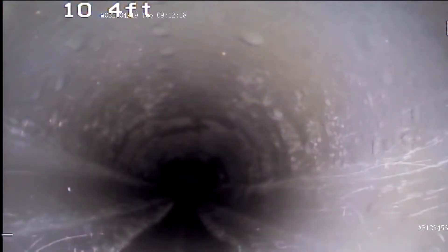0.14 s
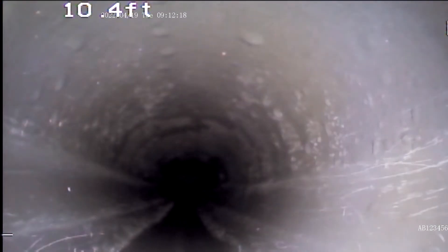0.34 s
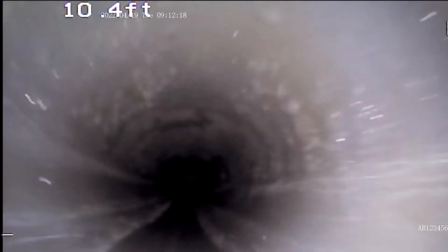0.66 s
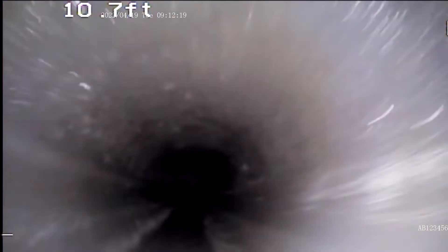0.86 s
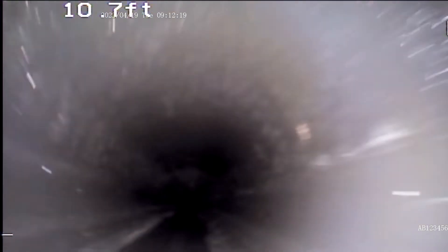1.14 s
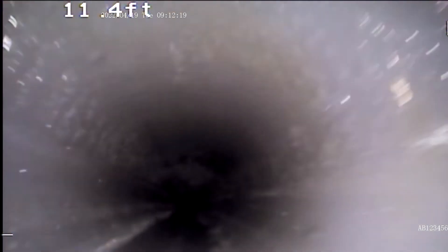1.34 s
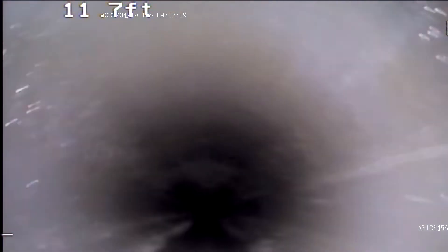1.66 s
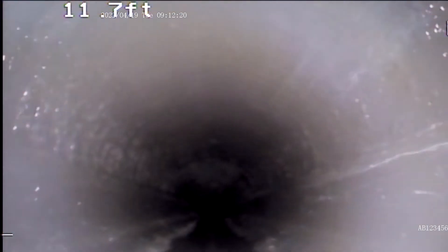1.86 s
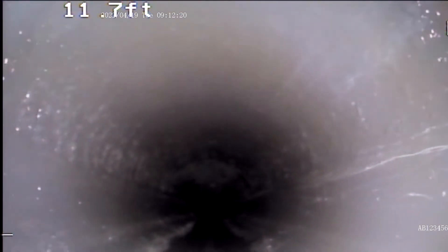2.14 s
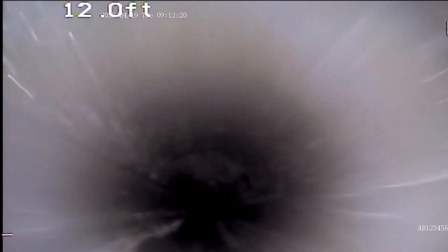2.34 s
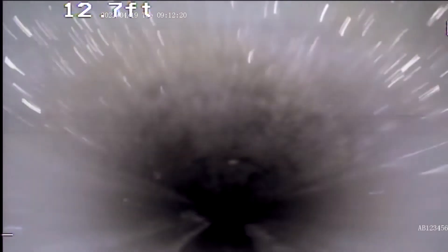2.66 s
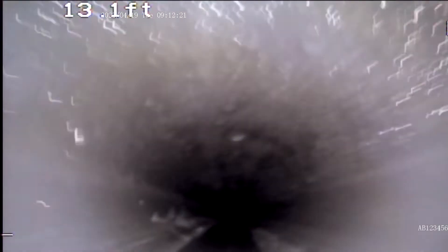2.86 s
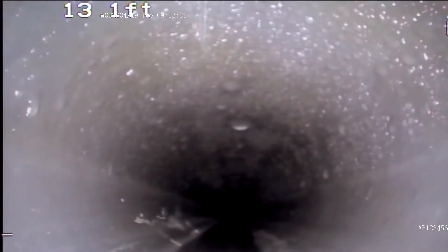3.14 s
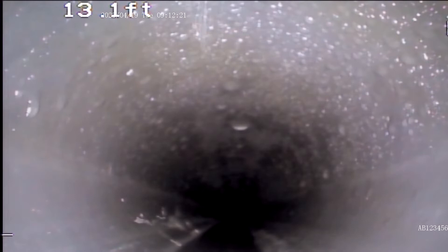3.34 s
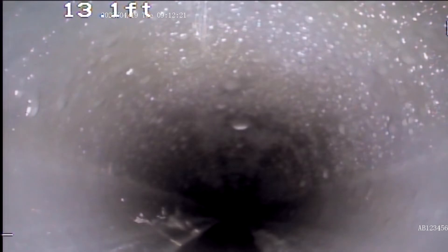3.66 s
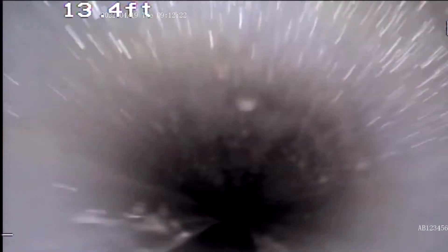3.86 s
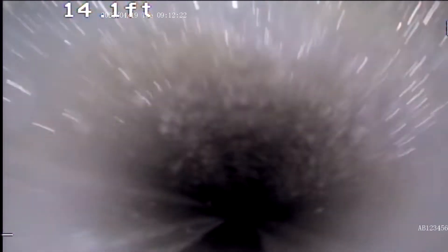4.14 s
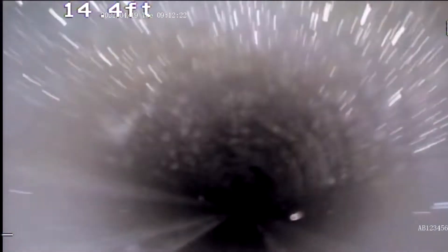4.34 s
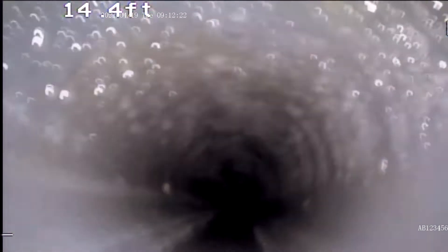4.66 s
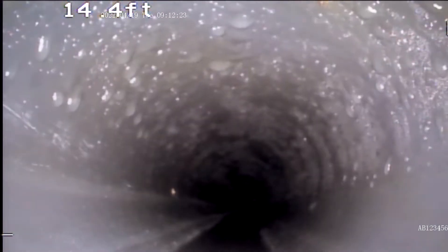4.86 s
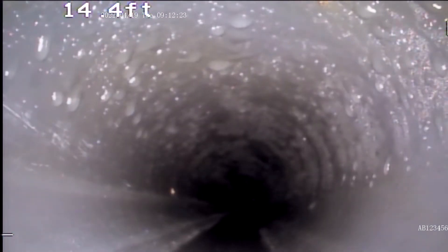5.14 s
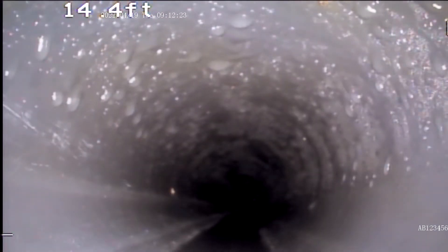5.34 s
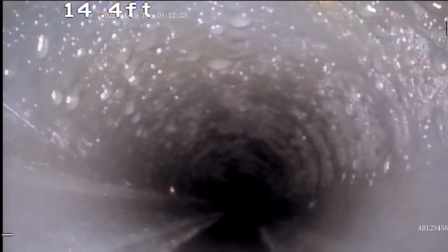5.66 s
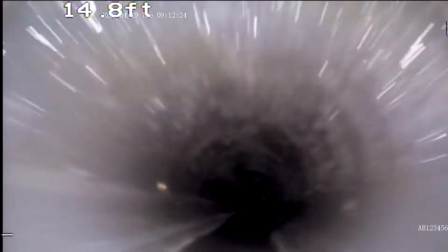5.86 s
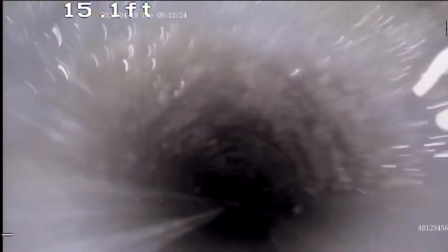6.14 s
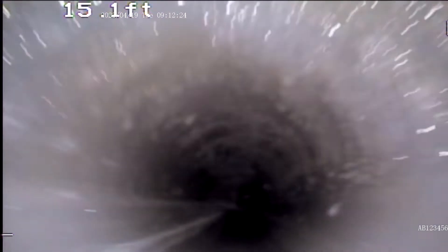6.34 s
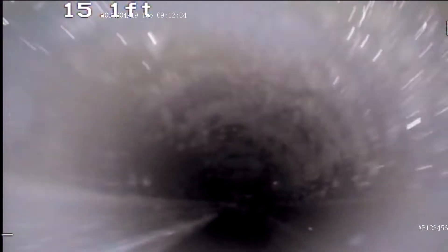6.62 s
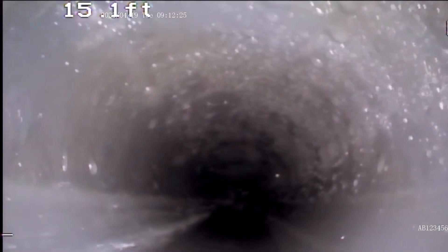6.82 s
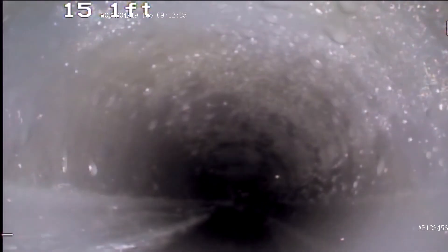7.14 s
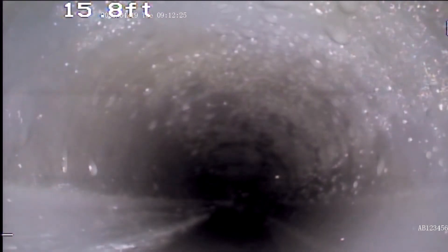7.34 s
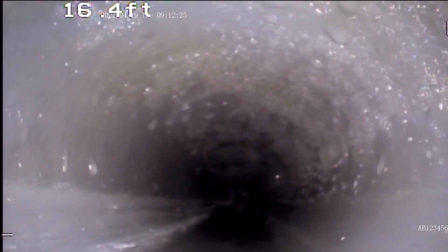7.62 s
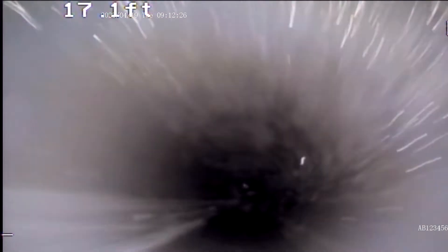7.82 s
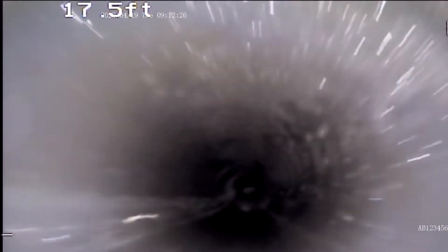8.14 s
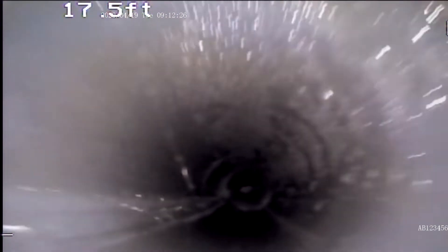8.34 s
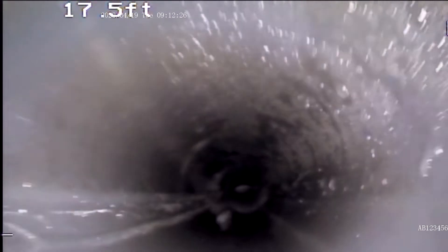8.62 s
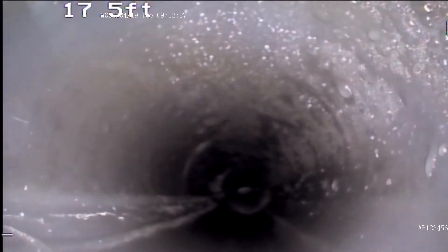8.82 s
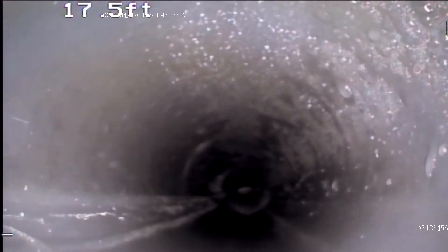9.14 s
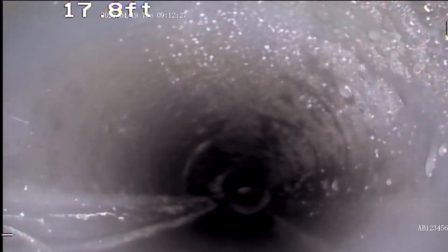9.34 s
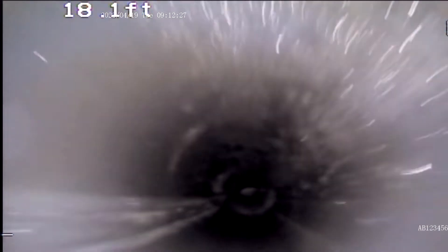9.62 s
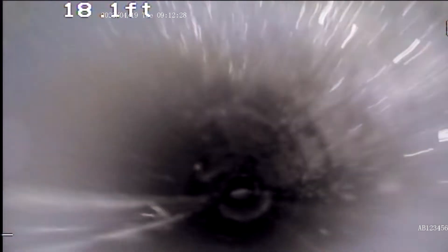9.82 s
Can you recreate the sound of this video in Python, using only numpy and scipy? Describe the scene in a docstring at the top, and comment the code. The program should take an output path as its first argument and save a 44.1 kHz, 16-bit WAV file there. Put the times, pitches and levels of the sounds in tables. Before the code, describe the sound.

Heard close from a small microphone on the reel housing, a stiff cable is pushed into a drain pipe. Gritty stick-slip scraping comes in irregular bursts, with hollow thumps and rattling clunks. Sharp knocks stand out near one, two, three and a half and five and a half seconds. The frame hums low after each shove, and quiet rumble and soft hiss lie beneath. The sound cuts out very briefly early on.

```python
"""A stiff cable is pushed off its reel into a drain pipe, beside a small microphone fixed to the reel's housing.
It scrapes in bursts: stick-slip clicks drive the resonances of drum, shell, fittings and cable guide.
It also knocks: short rattling contacts ring these parts and the frame, which hums when shaken at random.
Steady filtered noise gives room rumble and hiss. The sound drops out once for about a tenth of a second."""
import sys
import numpy as np
from scipy import signal
from scipy.fft import rfft, irfft
from scipy.io import wavfile
from scipy.ndimage import uniform_filter1d

SR = 44100
rng = np.random.default_rng(int(sys.argv[2]) if len(sys.argv) > 2 else 0)


def file_out(sig):
    """Save sig as 16-bit WAV at sys.argv[1]."""
    # one column per channel
    cols = np.atleast_2d(sig).T
    # limit, then scale
    lim = np.clip(cols, -1, 1)
    pcm = np.round(lim * 32767).astype(np.int16)
    wavfile.write(sys.argv[1], SR, pcm)


N = 440553
T = np.arange(N) / SR
STEP = 32  # samples between the times at which levels are worked out
SLOW = T[::STEP]

# Modes of the frame: pitch_hz, width_hz, level_db
FRAME = [(82.3, 12, -15.5), (96.8, 11, -11.5), (118.75, 6.8, -2.5), (163, 30, 3.5), (180, 11, -6)]


def slide(parts):
    """Stick-slip friction: one rubbing force excites the resonances of drum, shell, fittings and guide."""
    grains = wandering(slips(per_s=5600, spread_db=1.5), patchy_db=4.0)
    surges = gain_of(1.3 * drifting(span_s=0.02))
    hold = evened(grip(stutter_db=1.45, stutter_s=0.0092) * surges)
    gritty_hold = evened(hold ** 1.1)  # the fittings follow the grip's stutter most
    holds = np.array([hold, hold, gritty_hold, hold])
    forces = grains * holds * rubbing()
    return signal.oaconvolve(forces, parts, axes=1).sum(0)[:N]


def slips(per_s, spread_db):
    """Stick-slip force: a random train of dense clicks of either sign and uneven size."""
    clicks = (rng.random(N) < per_s / SR) * rng.choice([-1., 1.], N)
    size_db = spread_db * np.minimum(rng.exponential(1, N), 4)
    return clicks * gain_of(size_db)


def wandering(force, patchy_db):
    """Modal coupling: the point of contact moves, so the modes that it favours keep changing; rms 1."""
    spectrum = signal.stft(force, nperseg=1024, noverlap=768)[2]  # frequency by time
    patches = uniform_filter1d(rng.standard_normal(spectrum.shape), size=12, axis=1)
    patches = uniform_filter1d(patches, size=3, axis=0)
    favoured = spectrum * gain_of(patchy_db * evened(patches))
    return evened(signal.istft(favoured, nperseg=1024, noverlap=768)[1][:N])


def grip(stutter_db, stutter_s):
    """Relaxation: the grip changes suddenly at random and settles exponentially; rms 1."""
    catches = (rng.random(N) < 1 / (stutter_s * SR)) * rng.standard_normal(N)
    settling = evened(signal.lfilter([1], [1, -np.exp(-1 / (stutter_s * SR))], catches))
    return evened(gain_of(stutter_db * np.minimum(settling, 2)))


def rubbing():
    """Power addition: incoherent pushes sum to the gains into drum, shell, fittings and guide."""
    # Pushes of the cable; neighbouring ones may run on as stages of one scrape.
    # First and last level are those in the drum, shell and guide are relative to them:
    # start_s, length_s, first_db, last_db, shell_db, guide_db
    strokes = [(0.242, 0.77, -52.5, -51, -7.5, -14), (1.044, 0.23, -44, -34, -7, -12.5),
               (1.33, 0.17, -38.5, -30.5, -10, -15.5), (1.506, 0.78, -45, -62.5, -15.5, -15.5),
               (2.063, 0.064, -55, -34, -6, -7), (2.168, 0.17, -40.5, -39, -6.5, -19),
               (2.361, 0.53, -38, -49, -8, -14), (3.496, 0.047, -48, -40, -9, -15),
               (3.594, 0.028, -38, -35, -7, -27), (3.671, 0.68, -35.5, -59.5, -8, -12),
               (5.294, 0.22, -50, -42.5, -18, -21.5), (5.538, 0.39, -61, -50, -7.5, -9.5),
               (5.99, 0.93, -51.5, -60, -12.5, -12), (7.023, 0.3, -48.5, -61, -8, -3.5),
               (7.339, 0.098, -47.5, -32, -2, -20.5), (7.463, 0.091, -32.5, -36, -5, -16),
               (7.565, 0.11, -39.5, -42, 1.5, -9), (7.674, 0.19, -37.5, -47.5, -4.5, -15.5),
               (7.88, 0.66, -66.5, -62.5, 0, -6.5), (8.949, 0.023, -44, -37.5, -6.5, -14.5),
               (9.005, 0.045, -50, -44.5, 0, -12), (9.077, 0.15, -56, -56.5, -10, -4),
               (9.259, 0.05, -45.5, -36.5, -4, -5), (9.337, 0.14, -40.5, -45, -1.5, -10),
               (9.505, 0.066, -39, -44.5, 0, -8), (9.601, 0.37, -38.5, -68.5, -10.5, -6.5)]
    # The faint rub that never stops: drum_db, shell_db, fittings_db, guide_db
    rest_db = (-71, -78.5, -95, -80)
    attack_db_per_s, release_db_per_s = 1201, 496.5
    grit_swing = 1.4  # dB in the fittings per dB of scrape within a push
    power = gain_of(2 * np.array(rest_db))[:, None]
    for start, length, first_db, last_db, shell_db, guide_db in strokes:
        db = swell(start, length, first_db, last_db, attack_db_per_s, release_db_per_s)
        # the more a push reaches the shell, the grittier it is
        grit_db = -9.5 + 1.3 * shell_db
        swing_db = (grit_swing - 1) * (db - (first_db + last_db) / 2)
        levels_db = np.array([db, db + shell_db, db + grit_db + swing_db, db + guide_db])
        power = power + gain_of(2 * levels_db)
    return filled(np.sqrt(power))


def knocks(parts, base_contact_s, shudder_db, shudder_s):
    """Impact excitation: a short rattling contact and a weaker, longer shudder ring every part."""
    # Blows of the cable; the last three are relative to the peak in the shell, for frame, drum and fittings:
    # start_s, shell_peak_db, thump_db, boom_db, crack_db
    blow_table = [(1.001, -32.5, 14.5, 9.5, -9.5), (1.141, -28.5, 2, 8.5, -5.5), (1.199, -8, -9.5, -1, -6),
                  (1.228, -14.5, -14, 0.5, -7.5), (1.257, -23.5, 8, -20, -8), (1.334, -36, -10, -4, -3),
                  (1.414, -29.5, 8.5, 9, -43), (1.453, -21.5, 9, 4.5, -8), (1.697, -39, 8, 16, -8.5),
                  (1.741, -45, 19.5, 20.5, -8.5), (1.998, -34, -6, 2.5, -8), (2.13, -17.5, -11, -1, -6),
                  (2.143, -10, -26, -1, -7.5), (2.197, -38.5, 13, 10, 7.5), (2.53, -27, -24, -11, -8),
                  (3.234, -68.5, -6, 22, -10), (3.43, -41, -15.5, 3, -10.5), (3.659, -10, -12.5, -1.5, -6),
                  (3.881, -32, -22, -8, -9.5), (3.975, -43.5, -4, 5, -7), (4.035, -40, 7, 9, -12),
                  (4.552, -57.5, 28, 17, -14), (5.336, -31.5, 5.5, 1.5, -11), (5.386, -23, -17, -5, -40),
                  (5.402, -6, -19, -1.5, -7.5), (5.483, -37, 11.5, -11, -9.5),
                  (6.011, -29.5, -11, -4.5, -9), (6.048, -36.5, -10, 1.5, -18),
                  (6.26, -22, -5.5, -2.5, -7.5), (6.462, -65.5, 1, 23.5, -9), (6.721, -32.5, -41, -6, -10),
                  (6.783, -40, -17, -10.5, -8.5), (6.897, -40, -7, -8.5, -5),
                  (7.024, -53.5, 26.5, 16.5, -0.5), (7.407, -21, -16.5, -15, -7.5),
                  (7.812, -33.5, -17, 0, -8), (7.833, -34, 4, 10, -41), (8.961, -42, 3.5, 15, -2),
                  (9.245, -31.5, -7, -15.5, -33), (9.614, -22, -1, 3, -2.5), (9.635, -25, -27, 5.5, -10)]
    out, t = np.zeros(N + SR), np.arange(SR // 8) / SR
    shove = t * np.exp(-t / 0.0023)  # the heavy frame takes the blow mostly as one push
    for start, peak_db, thump_db, boom_db, crack_db in blow_table:
        # weak or boomy blows stay longer in contact
        contact_s = base_contact_s * gain_of(0.3 * boom_db - 0.11 * (peak_db + 10))
        u = t / contact_s
        envelope = np.exp(-u ** 2) + gain_of(shudder_db) * np.exp(-t / shudder_s)
        blow = rng.standard_normal(len(t)) * np.minimum(2.8 * u, 1) * envelope
        blow /= np.linalg.norm(blow)
        # the harder the blow, the brighter
        edge = -0.025 * peak_db * blow + np.diff(blow, prepend=0)
        # a weak crack is also a dull one
        top_hz = np.clip(15000 * gain_of(crack_db + 5.0), 4000, SR / 2.2)
        edge = signal.lfilter(*signal.butter(3, top_hz, fs=SR), edge)
        # frame, drum, shell, fittings, guide
        forces = [shove / shove.sum() + 0.14 * blow, blow, edge, edge, edge]
        answers = signal.fftconvolve(forces, parts, axes=1)
        levels_db = peak_db + np.array([thump_db, boom_db, 0, crack_db, -12])
        levels = gain_of(levels_db) / abs(answers).max(1)
        at = round(start * SR)
        out[at:at + answers.shape[1]] += levels @ answers
    low_cut = signal.butter(4, 62, "high", fs=SR, output="sos")  # nothing rings below the frame
    return signal.sosfilt(low_cut, out[:N])


def sway():
    """Forced resonance: random shaking hums the low frame modes nearest the shake's pitch, and the top mode."""
    low_gain, centre_hz, high_gain = shaking()
    loaded = 1 + 0.01 * drifting(span_s=0.08)  # the cable's load bends the pitch
    jolts = evened(gain_of(3.0 * drifting(span_s=0.025)))  # the top mode comes in broken bursts

    def hum(hz, width, db):
        """Noise-driven resonance of one mode."""
        return gain_of(db) * resonate(rng.standard_normal(N), hz * loaded, width, steady=0.8)

    low_tones = np.array([hum(*mode) for mode in FRAME[:3]])
    low_hz = np.transpose(FRAME)[0][:3, None]
    near = np.exp(-((low_hz - centre_hz) / 18) ** 2)
    near_power = (near ** 2 * low_tones.var(1)[:, None]).sum(0)
    low = (low_tones * near).sum(0) / np.sqrt(near_power)
    return low * low_gain + hum(*FRAME[-1]) * jolts * high_gain


def shaking():
    """Double decay: gain of the low modes, their pitch (the strongest shake leads) and gain of the top mode."""
    # Shakes that set the frame humming; low_db is before the lingering part is added,
    # high_db before the top mode's own level: start_s, hold_s, low_db, pitch_hz, high_db
    shakes = [(0, 0.069, -51.5, 123, -66), (0.381, 0.014, -49, 92.7, -32), (0.52, 0.47, -51, 103, -45),
              (1.002, 0.63, -42.5, 98.6, -37.5), (1.735, 0.051, -36.5, 94, -52),
              (2.127, 0.045, -40, 99.3, -33.5), (2.324, 0.55, -68, 99, -35),
              (2.773, 0.088, -46, 103, -34.5), (3.2, 0.34, -59, 97, -50.5), (3.629, 0.24, -43.5, 94.3, -35),
              (4.003, 0.31, -49.5, 90, -40.5), (5.317, 0.26, -39.5, 102.3, -35.5),
              (5.661, 0.82, -60, 92.2, -46.5), (6.253, 0.31, -48, 99, -40.5), (7.006, 0.18, -48, 104, -44),
              (7.376, 0.67, -49.5, 94.4, -42), (8.211, 0.67, -63, 77.2, -75.5),
              (8.949, 0.55, -49.5, 90.3, -46), (9.636, 0.015, -36, 97, -19)]
    rise_db_per_s, high_fade_db_per_s = 492.5, 64
    # the low modes drop fast, then linger
    low_fade_db_per_s, linger_db, linger_fade_db_per_s = 76.5, -11, 15
    low, pitch, high = 1e-20, 0, 1e-20
    for start, hold, low_db, hz, high_db in shakes:
        fast_db = swell(start, hold, low_db, low_db, rise_db_per_s, low_fade_db_per_s)
        slow_db = linger_db + swell(start, hold, low_db, low_db, rise_db_per_s, linger_fade_db_per_s)
        power = gain_of(2 * fast_db) + gain_of(2 * slow_db)
        low, pitch = low + power, pitch + power * hz
        high = high + gain_of(2 * swell(start, hold, high_db, high_db, rise_db_per_s, high_fade_db_per_s))
    return filled([np.sqrt(low), pitch / low, np.sqrt(high)])


def resonate(x, hz, width, steady):
    """Heterodyne resonator: shifts hz to zero, smooths twice, evens out part of the fading, shifts back; rms 1."""
    turn = np.exp(2j * np.pi * np.cumsum(hz) / SR)
    r = np.exp(-np.pi * width / SR)
    slow = signal.lfilter([1], [1, -2 * r, r ** 2], x / turn) + 1e-9
    return evened((turn * slow / abs(slow) ** steady).real)


def room():
    """Stationary coloured noise: rumble of the surroundings and microphone hiss."""
    # Spectral density of the noise before it is scaled to its rms level: pitch_hz, relative_db (per Hz)
    colour_table = [(25, -28), (94, -16), (527, -34), (1040, -40.5), (1900, -54.5), (15800, -60.5)]
    rms_db = -58.5
    hz, (f, db) = np.fft.rfftfreq(N, 1 / SR), np.transpose(colour_table)
    colour = gain_of(np.interp(np.log(hz + 1), np.log(f + 1), db))
    noise = irfft(rfft(rng.standard_normal(N)) * colour, N)
    return gain_of(rms_db) * evened(noise)


def ringing(modes, rise_s):
    """Modal superposition: a part answers a unit push with a sum of decaying sines; energy 1."""
    t = np.arange(SR // 2) / SR
    out = np.zeros(len(t))
    for hz, width, db in modes:
        decay = np.sqrt(width) * np.exp(-np.pi * width * t)
        out += gain_of(db) * decay * np.sin(2 * np.pi * hz * t)
    out *= 1 - np.exp(-t / rise_s)  # a soft start keeps each part out of its neighbours' bands
    return out / np.linalg.norm(out)


def swell(start, length, first_db, last_db, rise, fall):
    """Exponential growth and decay: straight lines in dB up to first_db, on to last_db, then down (dB a second)."""
    held = np.interp(SLOW, [start, start + length + 1e-6], [first_db, last_db])
    before = rise * np.maximum(start - SLOW, 0)
    after = fall * np.maximum(SLOW - start - length, 0)
    return held - before - after


def drifting(span_s):
    """Low-passed chance: noise averaged twice over the span; rms 1."""
    size = max(round(span_s * SR / STEP), 1)
    chance = uniform_filter1d(rng.standard_normal(len(SLOW)), size=size)
    chance = uniform_filter1d(chance, size=size)
    return filled([evened(chance)])[0]


def filled(rows):
    """Linear interpolation of slow curves to every sample."""
    return np.array([np.interp(T, SLOW, row) for row in rows])


def gain_of(db):
    """The decibel law: level to amplitude factor."""
    return 10 ** (np.asarray(db) / 20)


def evened(x):
    """Normalisation of the effective value: scales to rms 1."""
    return x / np.sqrt(np.mean(x ** 2) + 1e-20)


def scene():
    """Linear superposition: sliding and blows share the ringing parts; the frame's hum and the room add."""
    # Modes of the drum, shell, fittings and cable guide: pitch_hz, width_hz, level_db
    drum_modes = [(336.6, 25, 2), (457.8, 89, 11.5), (531, 11, 1.5)]
    shell_modes = [(744.3, 190, 5.5), (1058.5, 59, 4), (1946, 120, -1.5), (2060, 350, 4.5)]
    fitting_modes = [(3300, 310, -2), (3754, 600, -0.5), (4474, 990, -6.5), (5460, 1000, -11.5),
                     (8280, 1300, -9), (10300, 5600, -6)]
    guide_modes = [(1123.4, 25, -1.5), (1479, 41, 1.5), (1664, 120, 2), (4860, 410, -15)]
    frame = ringing(FRAME, rise_s=0.0044)
    drum = ringing(drum_modes, rise_s=0.00049)
    shell = ringing(shell_modes, rise_s=0.00047)
    fittings = ringing(fitting_modes, rise_s=0.0001)
    guide = ringing(guide_modes, rise_s=0.00059)
    scrapes = slide(np.array([drum, shell, fittings, guide]))
    blows = knocks((frame, drum, shell, fittings, guide), base_contact_s=0.0084, shudder_db=-9.5, shudder_s=0.016)
    return (scrapes + blows + sway() + room())[None]


def record(dry):
    """Conversion and band limiting: a small offset, one silent gap, then a linear-phase low-pass."""
    # The gap in the sound: start_s, end_s
    dropout = (.642, .758)
    offset, edge_hz = -0.00375, 15900
    running = (T < dropout[0]) | (T > dropout[1])
    low_pass = signal.firwin(511, edge_hz, window=("kaiser", 9), fs=SR)
    return signal.oaconvolve((dry + offset) * running, low_pass[None], "same")


dry = scene()
out = record(dry)
file_out(out)
```